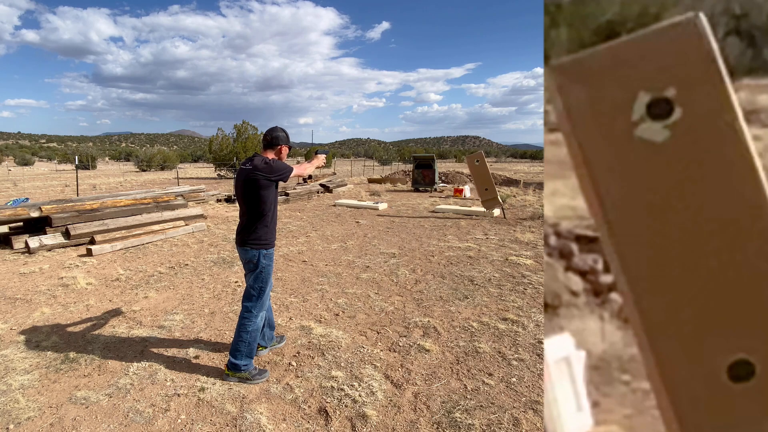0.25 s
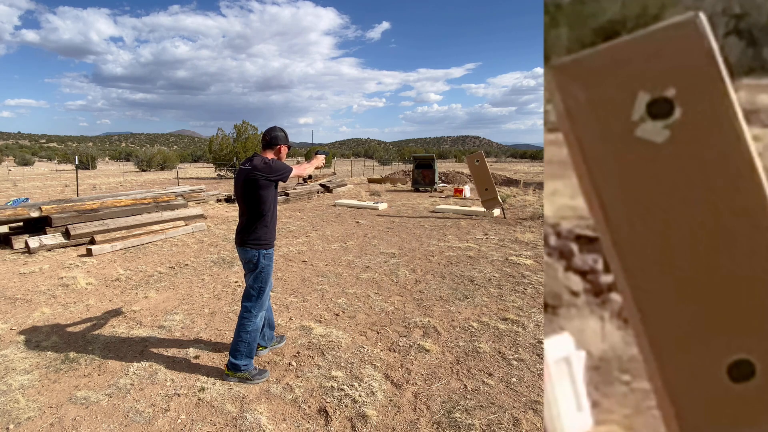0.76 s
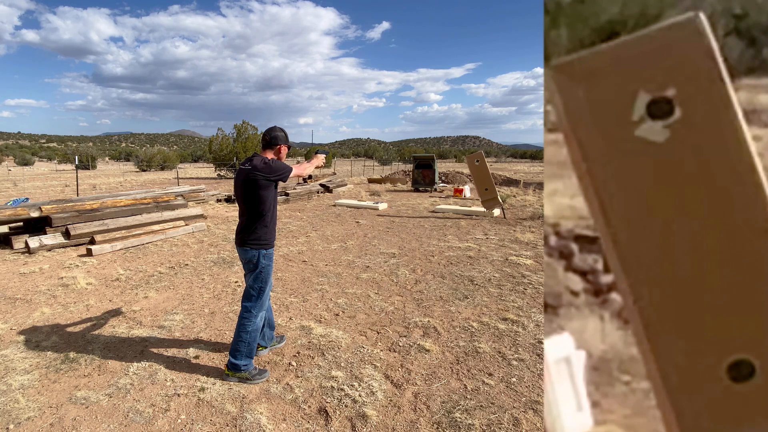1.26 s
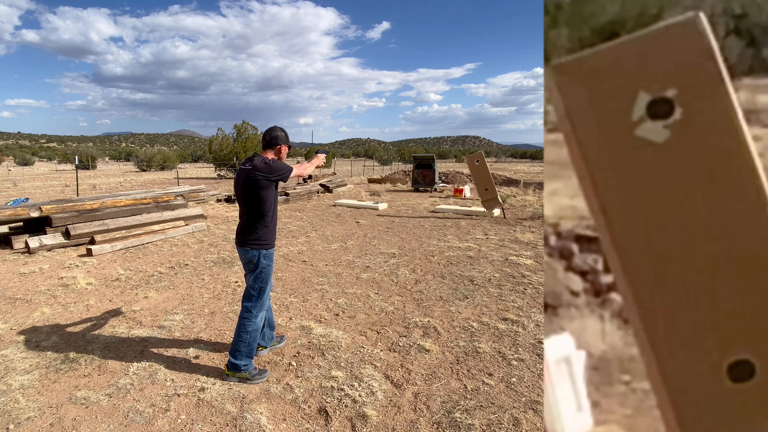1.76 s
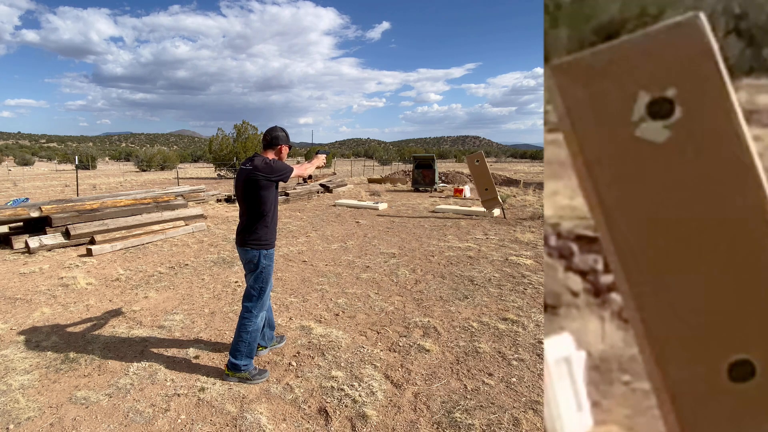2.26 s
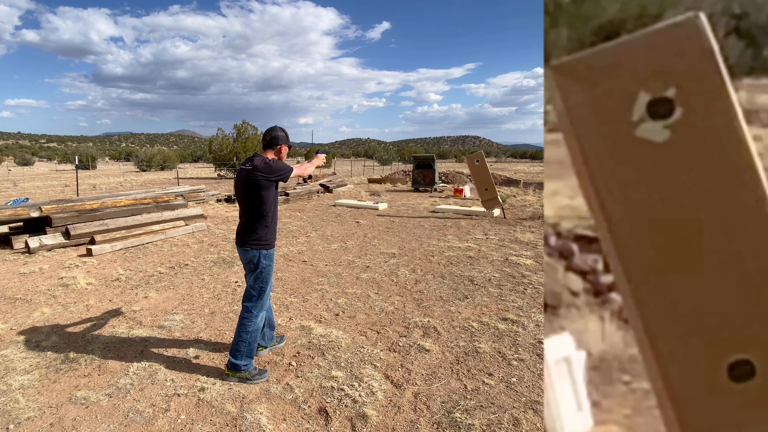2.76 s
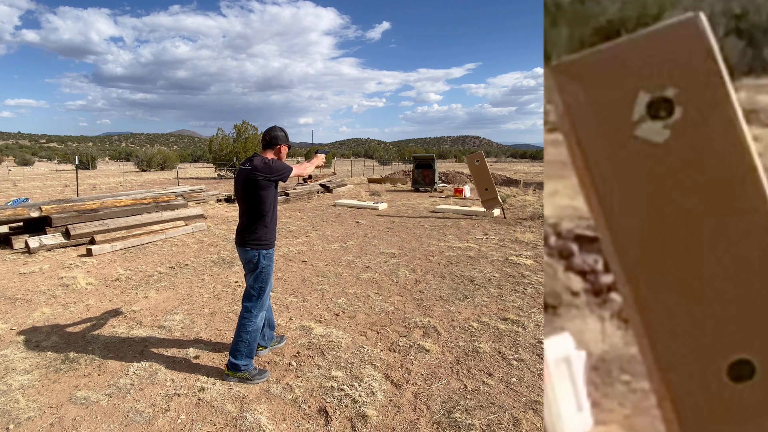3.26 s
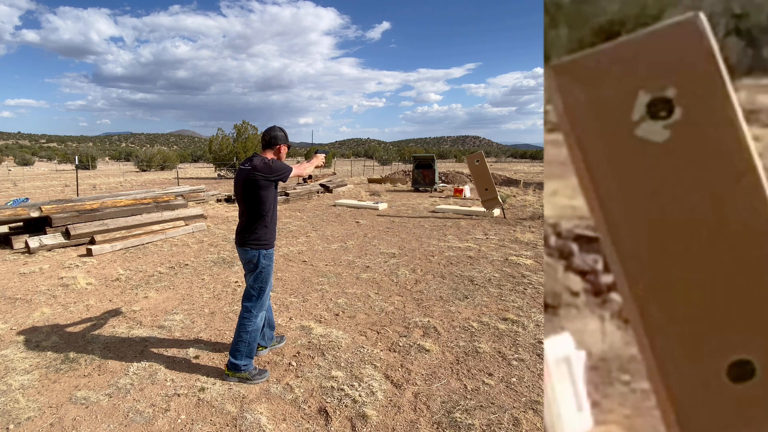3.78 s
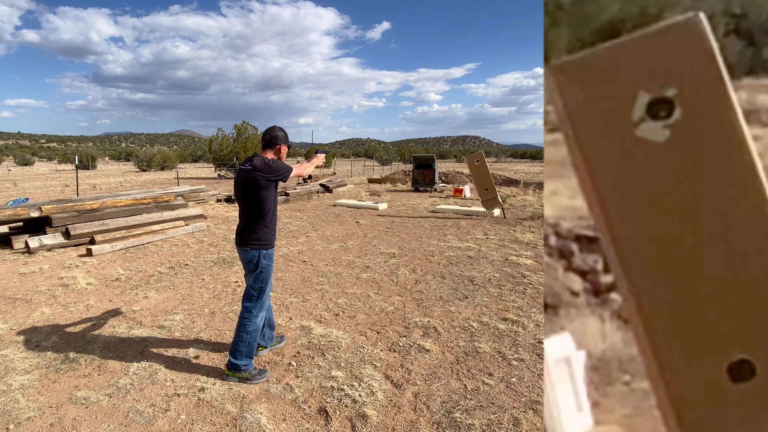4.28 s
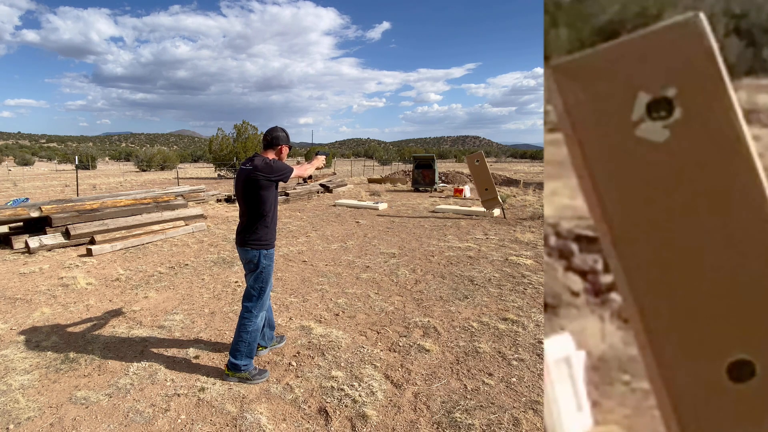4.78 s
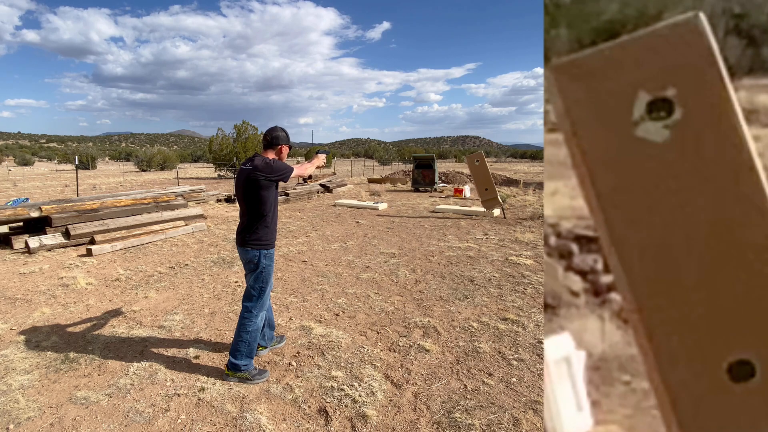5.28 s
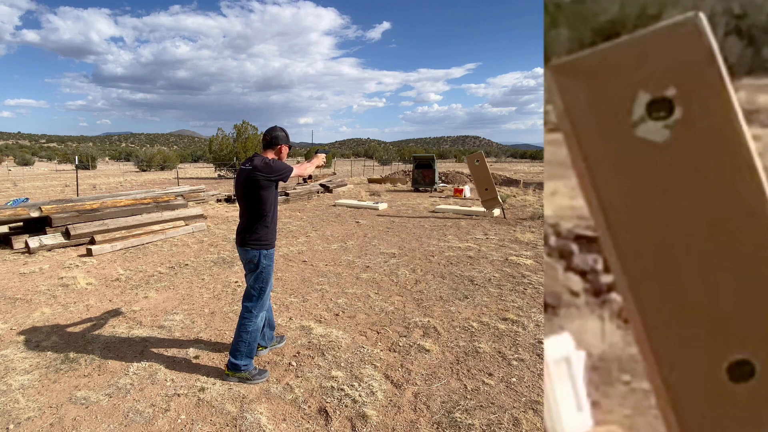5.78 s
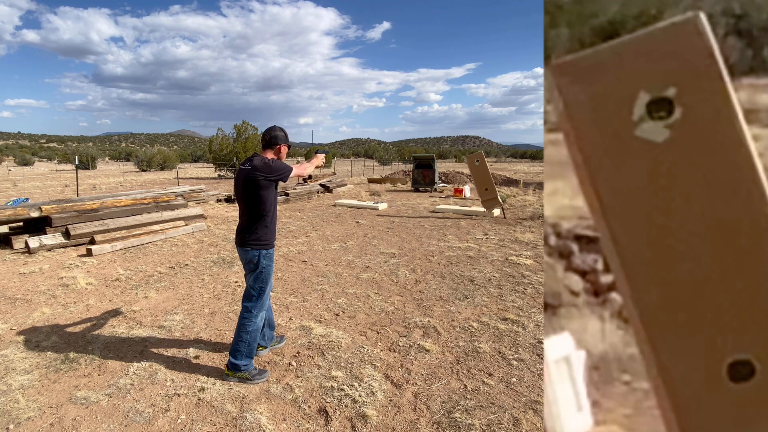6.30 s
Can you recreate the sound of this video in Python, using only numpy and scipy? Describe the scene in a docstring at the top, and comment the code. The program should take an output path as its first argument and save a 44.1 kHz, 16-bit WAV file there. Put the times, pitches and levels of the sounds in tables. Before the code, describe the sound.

Over a quiet outdoor hush and soft wind on the microphone, an air pistol a few metres away lets off five steadily paced shots. Each is a snappy burst of gas with a clacking slide, then the quick smack of a pellet on wood and a small trigger tick. Brief echoes scatter around the yard. A barely audible whine trails the fourth hit, and the wind rises slightly at the end.

```python
"""A gas pistol fired five times in an open, dry yard, a few metres from a phone.
Wind presses slowly on the microphone from the start, over a far drone and a faint hush.
Each shot: the hammer ticks, gas blasts from the muzzle, the slide knocks back and home, the pellet
cracks on a board, the trigger is let go. The same scattered objects echo every blast.
After the fourth hit the pellet tumbles off with a faint whine. The wind rises after the last shot."""
import sys
import numpy as np
from scipy import signal
from scipy.io import wavfile
from scipy.ndimage import uniform_filter1d

SR = 44100
rng = np.random.default_rng(int(sys.argv[2]) if len(sys.argv) > 2 else 0)


def transcribe(signal):
    """Save signal, clipped to [-1, 1], as a 16-bit WAV file at the path in sys.argv[1]."""
    frames = np.atleast_2d(signal).T
    limited = np.clip(frames, -1, 1)
    pcm = np.round(limited * 32767).astype(np.int16)
    wavfile.write(sys.argv[1], SR, pcm)


N = 288414

# wind on the microphone: time_s, pressure_db, rumble_db
WIND_LEVELS = [(0.0, -21.5, -58), (0.16, -39, -60), (0.51, -40.5, -65.5), (0.86, -23.5, -64.5),
               (0.98, -31, -69), (1.26, -40.5, -67.5), (1.46, -52, -69), (1.89, -41.5, -66),
               (2.24, -50.5, -71), (3.09, -41, -67.5), (3.5, -43.5, -65), (4.22, -38, -68),
               (4.72, -43, -64), (4.83, -48.5, -64), (5.3, -47.5, -67), (5.7, -41.5, -66.5),
               (6.19, -22, -58), (6.54, -36, -52.5)]
# far drone: time_s, level_db
DRONE_LEVELS = [(0.0, -78), (0.46, -72.5), (0.75, -79), (2.15, -64.5), (2.57, -74), (3.71, -61.5),
                (3.92, -68.5), (4.63, -67.5), (4.97, -72.5), (6.21, -74.5), (6.41, -60.5), (6.54, -67)]
# faint hush: centre_hz, width_hz, level_db
HUSH_BANDS = [(225, 80, -69), (335, 330, -79.5), (458, 33, -85), (850, 660, -88), (1810, 1300, -92.5),
              (4470, 4000, -87.5), (9418, 26000, -80), (13600, 2800, -90)]
# tumbling pellet: spin_multiple, level_db, rise_s
WHINE_HARMONICS = [(3, -84, .12), (4, -69, .05), (5, -86, .12), (6, -84, .12), (8, -81, .22), (10, -89, .2)]

# pellet on the board: start_s, level_db, ring_db
BOARD_HITS = [(0.3386, -8, -2.5), (1.9427, -9, -5.5), (3.2669, -9, -3.5), (4.5676, -9.5, 0),
              (5.8272, -8.5, -7.5)]
# ring of the wood: pitch_hz, level_db, t60_s
BOARD_MODES = [(416, -32, 0.15), (500, -24.5, 0.08), (725, -11.5, 0.049), (1000, -20.5, 0.05),
               (1872, -26.5, 0.11), (2930, -45.5, 0.068), (2990, -43, 0.04), (4570, -53, 0.056),
               (9170, 5, 0.0026)]
# swing of the whole board: centre_hz, width_hz, level_db, t60_s
SWAY_BANDS = [(190.5, 170, -28, 0.28), (490, 210, -19.5, 0.11)]
# splintering wood: centre_hz, width_hz, level_db, t60_s
SPLINTER_BANDS = [(1390, 3100, -11.5, 0.037), (5000, 3100, -11.5, 0.019), (10440, 18000, -18, 0.031)]

# clearest reflectors, farthest last: delay_s, level_db, pitch_hz, cycles
CLEAR_ECHOES = [(.0410, -11.5, 1250, .7), (.0414, -21, 3700, 1.2), (.0706, -29, 4500, 3.0),
                (.1249, -31, 1500, 1.2), (.1528, -38, 2000, .8), (.1610, -40, 3500, 1.2),
                (.1905, -44, 2200, .8), (.2041, -38, 2200, .8), (.2339, -41, 1600, 1.2),
                (.2570, -42, 3600, 2.2), (.2730, -50, 1900, 1.2), (.2855, -51, 1500, 1.2),
                (.3497, -52, 1500, 1.2), (.3688, -53, 1700, 1.2), (.4030, -57, 2600, 1.0),
                (.4345, -60, 2500, 1.5), (.5362, -57, 1400, 1.1)]
# dense scatter: centre_hz, width_hz, level_db, air_loss_db_per_s
SCATTER_BANDS = [(320.36, 300, -9, 29.5), (655, 400, -13, 24.5), (1160, 700, -7, -1.5),
                 (2360, 1600, -3.5, 0), (3800, 3500, -1, 20), (5930, 5000, -3, 69.5), (8400, 3500, -6, 96),
                 (13200, 2600, -19, 110)]
# scatter from bushes and stacks: delay_s, level_db, spread_s
SCATTER_SWELLS = [(.012, -26, 0.0085), (.045, -36, .009), (.085, -43, .015), (.126, -42, .009),
                  (.157, -50.5, .012), (.222, -52.5, .022), (.274, -59, 0.0061), (0.328, -64.5, 0.066),
                  (.372, -84, 0.015), (.435, -77, 0.034)]

# hammer, slide back, slide home for each shot: start_s, level_db
ACTION_KNOCKS = [(0.2467, -43.5), (0.2751, -18.5), (0.2995, -27), (1.8560, -38), (1.8775, -22),
                 (1.904, -32), (3.1815, -38), (3.2033, -7), (3.2348, -24), (4.4800, -35.5), (4.5017, -14),
                 (4.5358, -30.5), (5.737, -34), (5.7634, -19.5), (5.7945, -26.5)]
# trigger release and other small ticks: start_s, knock_db, ring_db, ring_hz
SMALL_TICKS = [(0.481, -48, -46, 7180), (0.494, -45.5, -36, 3070), (1.25, -64, -65, 4810),
               (2.068, -47, -55.5, 7500), (2.0838, -42.5, -34.5, 2956), (3.3931, -44.5, -56, 7630),
               (3.4045, -45.5, -35, 2960), (3.685, -70, -70, 5160), (4.6850, -48.5, -46, 7330),
               (4.7007, -43, -35.5, 2930), (5.9288, -47, -47, 7400), (5.9470, -44, -35.5, 2938),
               (6.2220, -83.5, -57.5, 2630)]
# noise of a metal knock: centre_hz, width_hz, level_db, t60_s
KNOCK_BANDS = [(1800, 1200, -6, .014), (3500, 2500, -3, .014), (6300, 3000, 0, .012),
               (9000, 3000, -5, .012), (13500, 4000, -11, .01)]
# ring of the steel slide: pitch_hz, level_db, t60_s
SLIDE_MODES = [(4750, -21, .1), (7300, -24, .06), (9350, -19, .09)]

# pressure waves leaving the barrel: delay_ms, level_db, pitch_hz
MUZZLE_WAVES = [(0.1, -3, 2200), (0.62, -1, 2300), (2.15, 0, 1900), (2.8, -4, 1900), (4.3, -4, 1400),
                (6.15, -3, 2200)]
# barrel air (first two rows), barrel and frame: pitch_hz, level_db, delay_ms, t60_s
PISTOL_MODES = [(250, -17, 0.58, 0.12), (505, -25.5, 1.2, 0.058), (1750, -17, 2.5, 0.046),
                (5300, -3, 1.1, 0.0037)]
# escaping gas: centre_hz, width_hz, level_db, t60_s
GAS_BANDS = [(660, 560, -17.5, 0.058), (1410, 920, -13.5, 0.055), (2600, 1700, -12, 0.049),
             (4670, 3000, -3, .03), (8200, 2100, -9, 0.036), (12300, 1900, -18, 0.053)]
# shots: start_s, level_db, barrel_db, octave_db, far_echo_db
FIRINGS = [(0.2645, -1, 1.5, 16.5, -5), (1.8687, 0, 0, 2.5, 3.5), (3.1926, -0.5, 0.5, -2.5, -7),
           (4.4913, -1, 1, -6, 2.5), (5.749, -1.5, -1, -6, 6.5)]

ECHO_TAIL_S = 1.0


def undb(db):
    """Decibels to gain."""
    return 10 ** (np.asarray(db) / 20)


def clock(length_s):
    """Sample times."""
    return np.arange(int(length_s * SR)) / SR


def fade(t, t60_s):
    """Exponential decay from t = 0, silent before."""
    return (t >= 0) * np.exp(-np.log(1000) * np.maximum(t, 0) / t60_s)


def hiss(size, hz, width_hz, order=1):
    """Noise band of unit rms."""
    edges_hz = np.sqrt(hz ** 2 + width_hz ** 2 / 4) + np.array([-width_hz, width_hz]) / 2
    sos = signal.butter(order, np.minimum(edges_hz, .49 * SR), "bandpass", fs=SR, output="sos")
    band = signal.sosfilt(sos, rng.standard_normal(size))
    return band / band.std()


def walk(size, rate_hz):
    """Slewed random steps, spread near 1."""
    hold = int(SR / rate_hz)
    return uniform_filter1d(np.repeat(rng.standard_normal(size // hold + 1), hold), hold)[:size]


def curve(table):
    """Value columns of a time table, interpolated to every sample."""
    time_s, *columns = np.transpose(table)
    return [np.interp(np.arange(N) / SR, time_s, column) for column in columns]


def burst(t, bands):
    """Noise bands that start together and die at their own rates."""
    return sum(undb(db) * fade(t, t60_s) * hiss(len(t), hz, width_hz, order=2)
               for hz, width_hz, db, t60_s in bands)


def mode(t, hz, db, t60_s, phase_rad=0):
    """One damped resonance."""
    return undb(db) * fade(t, t60_s) * np.sin(2 * np.pi * hz * t + phase_rad)


def puff(t, hz, cycles):
    """Short pressure wave, suction first."""
    return np.sin(2 * np.pi * hz * t) * np.exp(-.5 * (t * hz / (cycles / 2)) ** 2)


def add(out, sound, start_s):
    """Mix a sound in at a time."""
    i = int(round(start_s * SR))
    out[i:i + len(sound)] += sound[:N - i]


def background():
    """A far drone and a faint hush, both wavering slightly."""
    drone_db, = curve(DRONE_LEVELS)
    drone = undb(drone_db + walk(N, 3.2)) * hiss(N, 150, 43, order=2)
    return drone + sum(undb(db + .7 * walk(N, 6.6)) * hiss(N, hz, width_hz)
                       for hz, width_hz, db in HUSH_BANDS)


def wind(buffet_db=9.5, flicker_db=5):
    """Slow pressure, buffeting and rumble on the microphone port."""
    pressure_db, rumble_db = curve(WIND_LEVELS)
    pressure = undb(pressure_db) * hiss(N, 2.8, 5.5, order=3)
    buffet = undb(rumble_db + buffet_db + flicker_db * walk(N, 2.5)) * hiss(N, 10, 16, order=2)
    rumble = undb(rumble_db) * hiss(N, 58, 68, order=2)
    return pressure + buffet + rumble


def pellet_whine(start_s=4.70, spin_hz=450, sag_hz_per_s2=75):
    """The fourth pellet tumbles off: unsteady harmonics of a spin that slows ever faster."""
    rise_db_per_s, hold_s, fall_db_per_s = 130, .15, 80
    t = np.maximum(np.arange(N) / SR - start_s, 0)
    phase = 2 * np.pi * np.cumsum(spin_hz - sag_hz_per_s2 * t ** 2) / SR
    out = np.zeros(N)
    for multiple, db, rise_s in WHINE_HARMONICS:
        drop_db = np.maximum(rise_db_per_s * (rise_s - t), fall_db_per_s * (t - rise_s - hold_s)).clip(0)
        out += np.sqrt(2) * undb(db - drop_db + 2.7 * walk(N, 56)) * np.sin(multiple * phase)
    return (t > 0) * out


def board(crack_db=4.5, crack_s=26e-6, sway_rise_s=.01):
    """Pellets strike wood: a sharp crack, splinters, then the board's dull ring."""
    out, t = np.zeros(N), clock(.3)
    spike = t / crack_s - 4
    crack = undb(crack_db) * (np.exp(-.5 * spike ** 2) - .3 * np.exp(-.5 * ((spike - 4) / 3) ** 2))
    for start_s, db, ring_db in BOARD_HITS:
        ring = sum(mode(t, *row, rng.uniform(0, 1)) for row in BOARD_MODES)
        sway = burst(t, SWAY_BANDS) * np.clip(t / sway_rise_s, 0, 1)
        hit = crack + undb(ring_db) * (ring + sway) + burst(t, SPLINTER_BANDS)
        add(out, undb(db) * hit, start_s)
    return out


def faint_echoes(count=14, level_db=-30, fall_db_per_s=71.5):
    """Randomly placed objects, weaker with distance; columns as in CLEAR_ECHOES."""
    objects = rng.uniform((.12, 1500), (.52, 3800), size=(count, 2))
    return [(delay_s, level_db - fall_db_per_s * delay_s, hz, 1.4) for delay_s, hz in objects]


def yard_scatter(shared_bands, correlation=.7, ground_db=-48.5, fall_db_per_s=70):
    """Dense echo off ground, bushes and stacks; part repeats each shot, moving air changes the rest."""
    t = clock(ECHO_TAIL_S)
    scatter = np.zeros(len(t))
    for shared, (hz, width_hz, db, loss_db_per_s) in zip(shared_bands, SCATTER_BANDS):
        fresh = np.sqrt(1 - correlation ** 2) * hiss(len(t), hz, width_hz, order=2)
        scatter += undb(db - loss_db_per_s * t) * (correlation * shared + fresh)
    ground_power = undb(ground_db - fall_db_per_s * t) ** 2
    swell_power = sum(undb(db) ** 2 * np.exp(-((t - delay_s) / spread_s) ** 2)
                      for delay_s, db, spread_s in SCATTER_SWELLS)
    grain_db = 2.2 * walk(len(t), 170) + 2.6 * walk(len(t), 900)
    return scatter * undb(grain_db) * np.sqrt(ground_power + swell_power)


def yard_slaps(echoes, far_echo_db, spread_db=1.6, smear_db=-24):
    """Single echoes of one blast, each smeared by a rough surface."""
    t, smear_t = clock(ECHO_TAIL_S), clock(.03)
    offsets_db = spread_db * rng.standard_normal(len(echoes))
    offsets_db[-1] = far_echo_db  # the longest path swings most with the wind
    slaps = sum(undb(db + offset_db) * puff(t - delay_s, hz, cycles)
                for (delay_s, db, hz, cycles), offset_db in zip(echoes, offsets_db))
    smear = undb(smear_db) * fade(smear_t, t60_s=.025) * rng.standard_normal(len(smear_t))
    return slaps + signal.fftconvolve(slaps, smear)[:len(t)]


def knock(t, db):
    """Metal parts meet; the steel slide rings on."""
    ring = sum(mode(t, *row, rng.uniform(0, 2 * np.pi)) for row in SLIDE_MODES)
    return undb(db) * (burst(t, KNOCK_BANDS) + ring)


def action(bounce_s=.0042, bounce_db=-7):
    """Hammer, slide and trigger, heard directly and again off the ground."""
    out, t = np.zeros(N), clock(.1)
    knocks = [(start_s, knock(t, db)) for start_s, db in ACTION_KNOCKS]
    ticks = [(start_s, knock(t, db) + mode(t, hz, ring_db, t60_s=.013))
             for start_s, db, ring_db, hz in SMALL_TICKS]
    for start_s, sound in knocks + ticks:
        add(out, sound, start_s)
        add(out, undb(bounce_db) * sound, start_s + bounce_s)
    return out


def muzzle_blast(t, barrel_db, octave_db, swell_s=.0024, breech_opens_s=.013, gas_rise_s=.001):
    """Pressure waves leave the barrel, barrel and frame ring, gas rushes out."""
    waves = sum(undb(db) * puff(t - ms / 1000, hz, cycles=.55) for ms, db, hz in MUZZLE_WAVES)
    barrel, octave, *frame = [mode(t - ms / 1000, hz, db, t60_s) for hz, db, ms, t60_s in PISTOL_MODES]
    # barrel air varies with the charge; it swells, then dies as the slide opens the breech
    column = undb(barrel_db) * barrel + undb(octave_db) * octave
    column *= np.clip(t / swell_s, 0, 1) * fade(np.maximum(t - breech_opens_s, 0), t60_s=.014)
    gas = burst(t, GAS_BANDS) * np.clip(t / gas_rise_s, 0, 1)
    return undb(-1) * waves + column + sum(frame) + gas


def shots(lead_s=.001):
    """Five blasts, all echoed by the same yard."""
    out, t = np.zeros(N), clock(.08) - lead_s
    shared_bands = [hiss(int(ECHO_TAIL_S * SR), hz, width_hz, order=2)
                    for hz, width_hz, *_ in SCATTER_BANDS]
    echoes = faint_echoes() + CLEAR_ECHOES
    for start_s, db, barrel_db, octave_db, far_echo_db in FIRINGS:
        add(out, undb(db) * muzzle_blast(t, barrel_db, octave_db), start_s - lead_s)
        yard = yard_scatter(shared_bands) + yard_slaps(echoes, far_echo_db)
        add(out, undb(db) * yard, start_s)
    return out


def scene():
    """Mono mix at the microphone; pistol and pellet lose their deep bass, the wind keeps its own."""
    bass_cut = signal.butter(2, 45, "highpass", fs=SR, output="sos")
    shooting = shots() + action() + board() + pellet_whine()
    return (signal.sosfilt(bass_cut, shooting) + wind() + background())[None]


def record(dry):
    """The phone dulls the highest treble, rounds the loudest peaks and cuts the top."""
    rolloff_hz, top_hz = 12200, 16500
    dull = signal.sosfilt(signal.butter(2, rolloff_hz, fs=SR, output="sos"), dry)
    return signal.sosfilt(signal.ellip(10, .2, 90, top_hz, fs=SR, output="sos"), np.tanh(dull))


dry = scene()
out = record(dry)
transcribe(out)
```